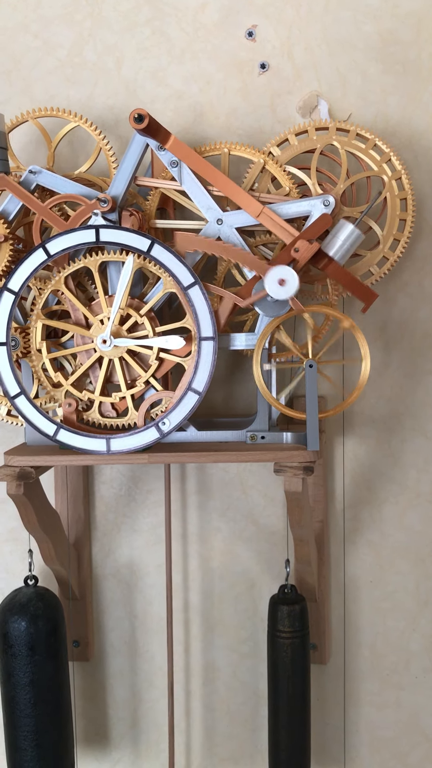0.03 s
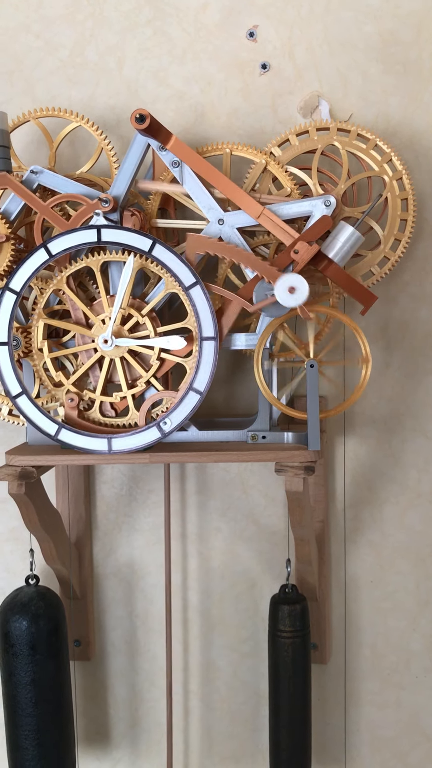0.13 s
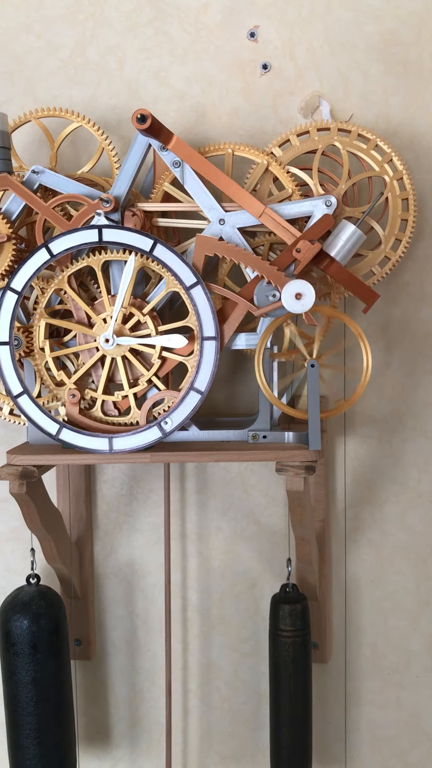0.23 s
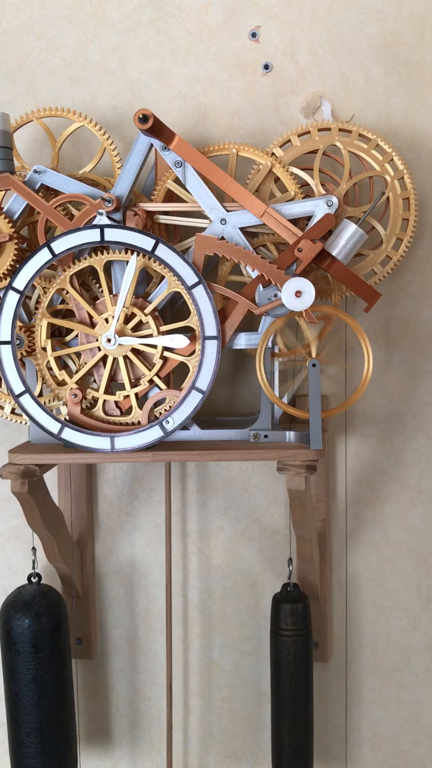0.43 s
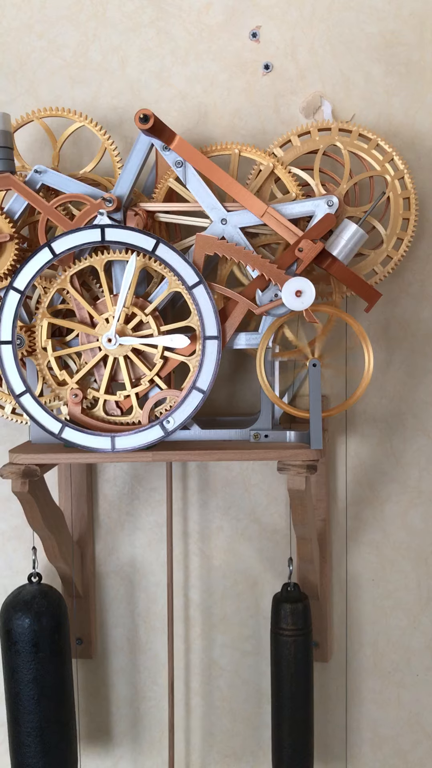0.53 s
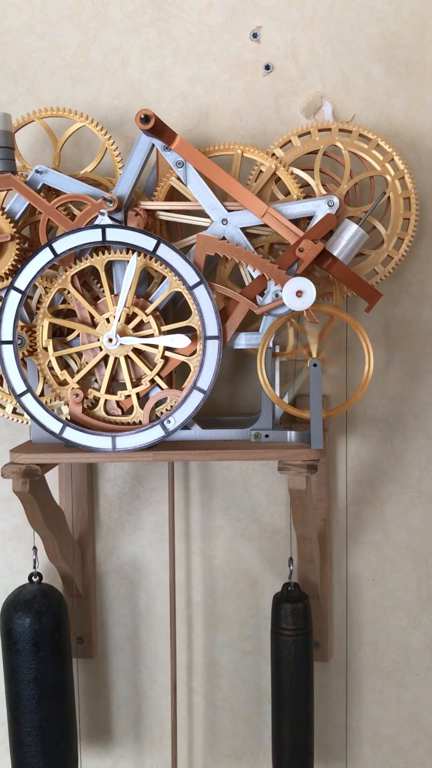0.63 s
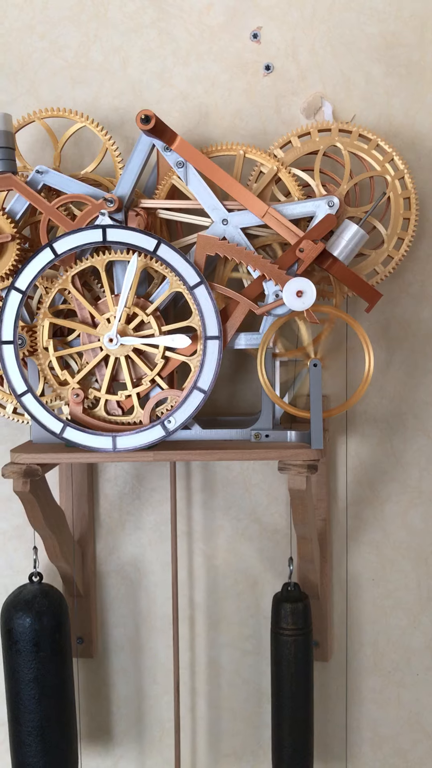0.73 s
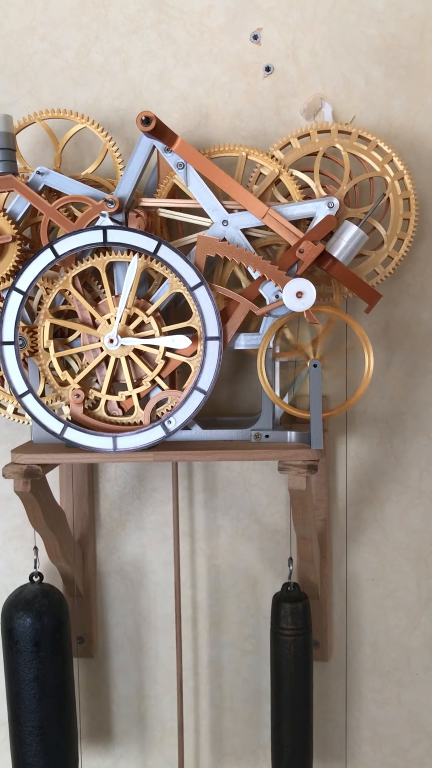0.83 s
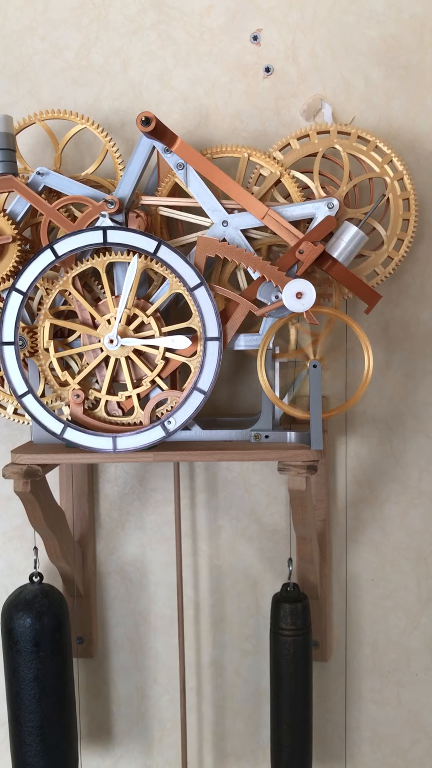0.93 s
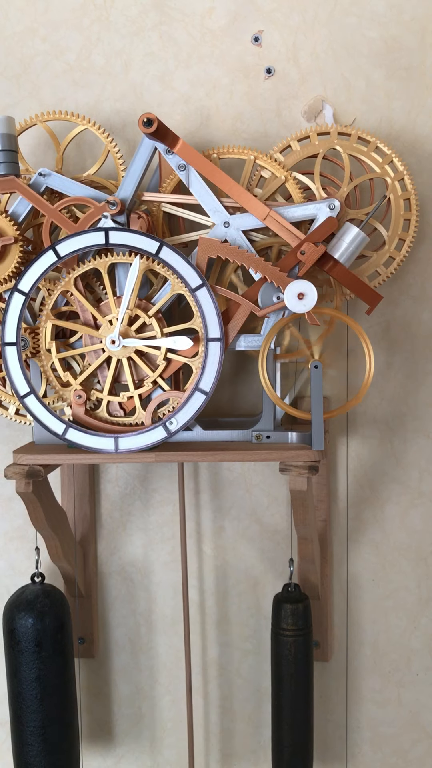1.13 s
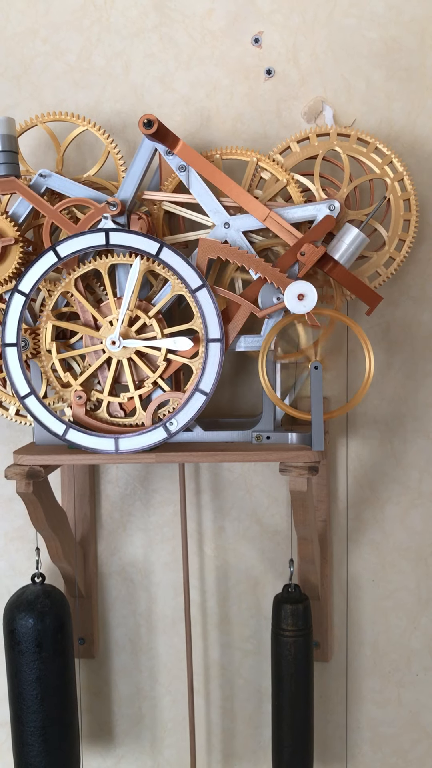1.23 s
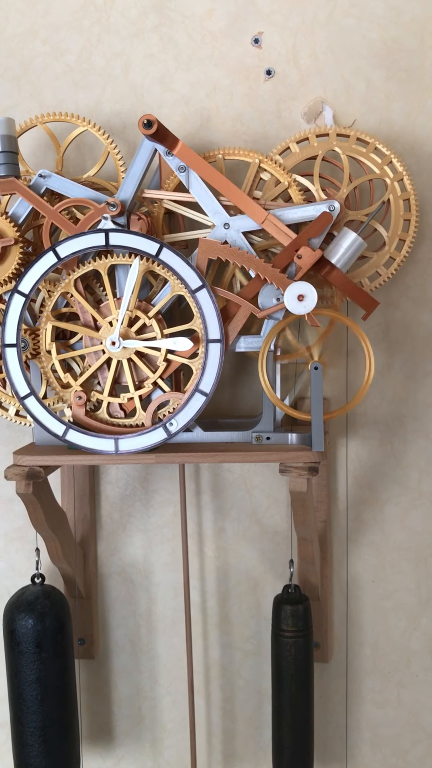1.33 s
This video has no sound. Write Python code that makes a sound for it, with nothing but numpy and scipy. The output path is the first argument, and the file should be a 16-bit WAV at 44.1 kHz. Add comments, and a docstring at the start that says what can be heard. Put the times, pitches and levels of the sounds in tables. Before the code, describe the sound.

A small bright clock bell struck once, ringing on amid clacking wooden levers.

```python
"""A small bright bell, struck once by the hammer of a weight-driven wooden clock in a quiet room.
Wooden levers clack and ring the frame as the hammer is lifted, let go and falls back on its rest.
The blow cracks and clinks; the bell rings on over faintly ticking, whirring gears, mains hum
and low rumble. Then the levers clack again."""
import sys
import numpy as np
from scipy import signal
from scipy.io import wavfile

SR = 44100
rng = np.random.default_rng(int(sys.argv[2]) if len(sys.argv) > 2 else 0)


def unload_wav(signal):
    """Save mono or channel-first audio to the path in sys.argv[1] as 16-bit WAV at rate SR, clipped to [-1, 1]."""
    wavfile.write(
        sys.argv[1],
        SR,
        np.round(np.clip(np.atleast_2d(signal).T, -1, 1) * 32767).astype(np.int16),
    )


N = 61739
TIME_S = np.arange(N) / SR
STRIKE_S, STRIKE_DB = 0.2422, -30


# f/Hz, level/dB re strike, t60/s, room build-up gain, step at second touch/dB
BELL_MODES = [(4942.4, -24.5, 13, 0, 0), (4943.1, -11.5, 1.3, 0, -12), (8780.3, -3.5, .8, 1.7, 0),
              (8780.6, -17.5, 3.6, 0, 0), (8771.2, -37, 7, 0, 0), (13330, -8.5, .4, 3, 0),
              (13331.7, -8.5, .4, 3, 0)]

def bell():
    """Close modes beat, flutter and build up in the room; the bouncing hammer damps one."""
    touch_s, touch_length_s = 0.275, 0.0025
    build_up_t60_s = 0.37
    flutter_db, flutter_t60_s, flutter_hz = -16, .33, 80
    blow = clicks([STRIKE_S], from_db([STRIKE_DB]))
    touched = np.clip((TIME_S - touch_s) / touch_length_s, 0, 1)
    flutter_envelope = fade([STRIKE_S], [STRIKE_DB + flutter_db], flutter_t60_s)
    out = 0
    for hz, db, t60_s, room_gain, step_db in BELL_MODES:
        direct = ring(blow, hz, t60_s)
        built_up = room_gain * (direct - ring(blow, hz, build_up_t60_s))
        flutter = flutter_envelope * noise_band(hz - flutter_hz, hz + flutter_hz)
        out += from_db(db) * ((direct + built_up) * from_db(step_db * touched) + flutter)
    return out


# Hammer and bell mount: f/Hz, relative level/dB, t60/s
HAMMER_MODES = [(974, -22, .5), (1953, -20, .42), (2315, -23, .17), (4530, -17, .1), (4625, -16, .11),
                (4740, -13, .06), (7050, -20, .12), (8688, -17, .25), (9850, -15, .08), (9997, -17, .12),
                (10635, -21, .18), (11650, -20, .14), (12400, -21, .19), (14662, -23, .11),
                (15110, -26, .16)]

def hammer():
    """The same blow sets the hammer and the bell's mount clinking briefly."""
    blow = clicks([STRIKE_S], from_db([STRIKE_DB - 0.5]))
    return sum((-1) ** k * from_db(db) * ring(blow, hz, t60_s)
               for k, (hz, db, t60_s) in enumerate(HAMMER_MODES))


# f/Hz, relative density/dB
CRACK_SPECTRUM = [(150, -13), (900, -11), (1450, -22), (2300, -3.5), (3500, -3), (4700, 3.5), (6500, 1),
                  (10000, 0.5), (12500, 1), (14500, -16.5), (16000, -28)]

def crack():
    """Metal meets metal in a bright, very short crack."""
    envelope = burst([STRIKE_S], np.array([STRIKE_DB]), t60_s=0.024, room_db=-17, room_t60_s=0.23)
    return coloured_noise(CRACK_SPECTRUM) * envelope


# t/s, level/dB, thud/dB, treble tilt/(dB/octave), struck part f/Hz, its relative level/dB
LEVER_KNOCKS = [(0.0, -44, -5.5, 2, 766, -5), (0.0974, -44, -10, 4, 5600, -15),
                (0.1108, -51, 0, -12, 3200, 1), (0.1256, -47.5, -2, 3, 3970, -6),
                (0.1367, -45.5, -10, 5.5, 3620, -6), (0.1416, -43.5, -12, 3, 2960, 0),
                (0.147, -46.5, -17, -27, 2680, 9), (0.1535, -52.5, 10.5, -12, 937, 9.5),
                (0.1828, -47, 4, 11, 4240, -6), (0.1916, -42.5, 1, -2.5, 1947, 0.5),
                (0.2483, -37, -10.5, -8, 4660, 4), (0.2854, -45, -12, 13, 4620, 4),
                (0.29, -39.5, -4.5, -2, 1950, -19), (0.332, -44, 0.5, 2, 667, -2),
                (1.3332, -44.5, -8.5, 0.5, 3330, -13), (1.336, -50.5, -1, 6, 3588, -5),
                (1.3404, -50, 2, 2, 950, 8.5), (1.3488, -46, 2.5, 2, 4630, -3),
                (1.375, -50.5, 2.5, -23, 920, -3), (1.392, -46.5, -4, 4.5, 3760, -3.5)]
# f/Hz, relative density/dB
KNOCK_SPECTRUM = [(100, -16), (250, -5.5), (550, -1.5), (950, 4), (1450, -4.5), (2000, 0), (4500, 1),
                  (7000, -6), (10000, -15), (15000, -30)]
# f/Hz, t60/s
ROOM_DECAY = [(150, 0.63), (1000, 0.34), (5000, 0.21), (15000, 0.14)]
THUD_HZ, TREBLE_HZ = 1240, 3770

def levers():
    """Wooden levers and pins knock, each with its own colour and pitch, and ring the frame."""
    times_s, db, thud_db, tilt_db, part_hz, part_db = np.transpose(LEVER_KNOCKS)
    out = frame(times_s, db + thud_db)
    for hz, noise in bands(KNOCK_SPECTRUM):
        low_db = thud_db / (1 + (hz / THUD_HZ) ** 2)
        high_db = tilt_db * max(np.log2(hz / TREBLE_HZ), 0)
        t60_s = 0.026 * (TREBLE_HZ / hz) ** .55   # lows last longer
        out += noise * burst(times_s, db + low_db + high_db, t60_s,
                             room_db=-9.5, room_t60_s=at_hz(ROOM_DECAY, hz))
    for at_s, hz, gain in zip(times_s, part_hz, from_db(db + part_db)):
        out += ring(clicks([at_s], [gain]), hz, t60_s=0.033)
    return out


# f/Hz, level/dB re contact, t60/s
FRAME_MODES = [(176.7, -24, 0.68), (268.8, -22.5, 0.36), (509, -14.5, 0.25), (575, -18.5, 0.24),
               (770, -15.5, 0.21), (955.6, -15.5, 0.19)]

def frame(times_s, db):
    """The wooden frame rings after each contact."""
    return struck_modes(FRAME_MODES, times_s, db)


# t/s, level/dB
GEAR_TICKS = [(0.5194, -64.5), (.594, -68), (0.6231, -58), (0.667, -60.5), (0.689, -61), (0.713, -68),
              (0.7674, -62), (.782, -55.5), (.823, -56), (0.846, -58), (0.9088, -52), (0.941, -61.5),
              (1.002, -53.5), (1.0404, -60), (1.0672, -53.5), (1.1625, -60), (1.2021, -53.5), (1.2212, -53),
              (1.235, -47.5), (1.31, -60)]
# f/Hz, relative density/dB
TICK_SPECTRUM = [(300, -14), (900, 4), (1400, -2.5), (2000, 7.5), (2600, -7.5), (4100, 3.5), (5600, -9.5),
                 (7200, 1.5), (9000, -31.5), (15000, -43)]
# f/Hz, level/dB re tick, t60/s
TOOTH_MODES = [(1980, -7.5, 0.015), (3316, -9, .02), (4000, -8, 0.023), (4480, -14, .02)]

def gear_ticks():
    """Gear teeth meet unevenly, each with a dull tick and a short ring."""
    top_hz = 7300
    times_s, db = np.transpose(GEAR_TICKS)
    envelope = burst(times_s, db - 6.5, t60_s=0.027, room_db=-10, room_t60_s=at_hz(ROOM_DECAY, TREBLE_HZ))
    contacts = coloured_noise(TICK_SPECTRUM) * envelope
    teeth = struck_modes(TOOTH_MODES, times_s, db)
    return butterworth(contacts + teeth, 6, top_hz, "low")


# t/s, level/dB
WHIRR_ENVELOPE = [(0, -57.5), (.08, -63), (.2, -55.5), (.45, -68.5), (.6, -71.5), (.92, -68.5), (1.14, -67),
                  (1.25, -66), (1.4, -60.5)]
# f/Hz, relative density/dB
WHIRR_SPECTRUM = [(120, -1), (180, -2), (230, 1.5), (290, 0), (400, 1.5), (520, -1.5), (800, -3),
                  (1400, -8.5), (2000, -12), (4000, -12), (7000, -21.5), (10000, -36), (15000, -21.5)]

def gear_whirr():
    """The turning wheels whirr softly."""
    level_db = np.interp(TIME_S, *np.transpose(WHIRR_ENVELOPE))
    return coloured_noise(WHIRR_SPECTRUM) * from_db(level_db)


# t/s, level/dB
LOAD_BUMPS = [(.912, -52), (1.17, -53.5), (1.255, -48.5)]

def load_bumps():
    """The frame rings softly as the gears take up load."""
    return frame(*np.transpose(LOAD_BUMPS))


# t/s, level before low-pass/dB
TRAIN_JOLTS = [(0.524, -49.5), (0.584, -54), (0.873, -52), (0.939, -46.5), (1.15, -53.5)]

def train_jolts():
    """The running gear train jolts the frame in soft, deep thumps."""
    times_s, db = np.transpose(TRAIN_JOLTS)
    thumps = ring(clicks(times_s, from_db(db)), hz=72.5, t60_s=.22)
    return butterworth(thumps, order=2, hz=90, kind="low")


# f/Hz, relative density/dB
RUMBLE_SPECTRUM = [(25, -28), (35, -34), (48, -1), (75, 0.5), (125, -9.5), (250, -10.5), (600, -36.5),
                   (4000, -71)]

def room_tone():
    """A slightly wavering mains hum over low rumble."""
    hum_hz, hum_db, waver_db, rumble_db = 100, -62, 1, -67
    hum_rms = from_db(hum_db + waver_db * noise_band(1, 4.1))
    hum = np.sqrt(2) * hum_rms * np.sin(2 * np.pi * hum_hz * TIME_S)
    return hum + from_db(rumble_db) * coloured_noise(RUMBLE_SPECTRUM)


def from_db(db):
    """Decibels to gain."""
    return 10 ** (np.asarray(db) / 20)


def at_hz(table, hz):
    """Read a table on a log-frequency axis."""
    table_hz, values = np.transpose(table)
    return np.interp(np.log(hz), np.log(table_hz), values)


def butterworth(x, order, hz, kind):
    """Causal filter with a flat passband."""
    return signal.sosfilt(signal.butter(order, hz, kind, fs=SR, output="sos"), x)


def noise_band(low_hz, high_hz):
    """Settled band of noise, rms 1."""
    noise = butterworth(rng.standard_normal(N + SR // 2), 2, [low_hz, high_hz], "band")[-N:]
    return noise / np.sqrt(np.mean(noise ** 2) + 1e-20)


def bands(spectrum):
    """(centre f/Hz, noise) per band; the powers sum to 1."""
    edges_hz = np.concatenate([np.geomspace(22, 700, 11)[:-1], np.geomspace(700, 17000, 27)])
    centres_hz = np.sqrt(edges_hz[:-1] * edges_hz[1:])
    gains = from_db(at_hz(spectrum, centres_hz)) * np.sqrt(np.diff(edges_hz))
    gains /= np.linalg.norm(gains)
    return [(hz, gain * noise_band(low_hz, high_hz))
            for hz, gain, low_hz, high_hz in zip(centres_hz, gains, edges_hz, edges_hz[1:])]


def coloured_noise(spectrum):
    """Steady noise, rms near 1."""
    return sum(noise for _, noise in bands(spectrum))


def clicks(times_s, gains):
    """One impulse per contact."""
    out = np.zeros(N)
    np.add.at(out, np.clip(np.asarray(times_s) * SR, 0, N - 1).astype(int), gains)
    return out + 1e-18


def fade(times_s, db, t60_s):
    """Envelope of contacts whose energy adds up and dies away."""
    pole = 1e-6 ** (1 / (t60_s * SR))
    return np.sqrt(signal.lfilter([1], [1, -pole], clicks(times_s, from_db(db) ** 2)))


def burst(times_s, db, t60_s, room_db, room_t60_s):
    """Envelope of short contacts and their tail in the room."""
    return np.hypot(fade(times_s, db, t60_s), fade(times_s, db + room_db, room_t60_s))


def ring(hits, hz, t60_s):
    """A unit click starts a decaying sine of height 1."""
    radius, step_rad = 1e-3 ** (1 / (t60_s * SR)), 2 * np.pi * hz / SR
    return signal.lfilter([0, np.sin(step_rad)], [1, -2 * radius * np.cos(step_rad), radius ** 2], hits)


def struck_modes(modes, times_s, db):
    """Each contact rings every mode with random polarity."""
    out = 0
    for hz, mode_db, t60_s in modes:
        gains = from_db(db + mode_db) * rng.choice([-1, 1], len(times_s))
        out += ring(clicks(times_s, gains), hz, t60_s)
    return out


def scene():
    """The clock in its room, mono."""
    strike = bell() + hammer() + crack()
    clockwork = levers() + gear_ticks() + gear_whirr() + load_bumps() + train_jolts()
    return (strike + clockwork + room_tone())[None]


def record(dry):
    """The microphone loses the deepest bass; the top is cut steeply."""
    low_cut_hz, high_cut_hz = 28.4, 15700
    thinned = butterworth(dry, 4, low_cut_hz, "high")
    return signal.sosfilt(signal.ellip(10, .2, 80, high_cut_hz, fs=SR, output="sos"), thinned)


dry = scene()
out = record(dry)
unload_wav(out)
```